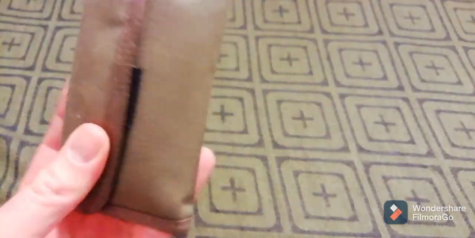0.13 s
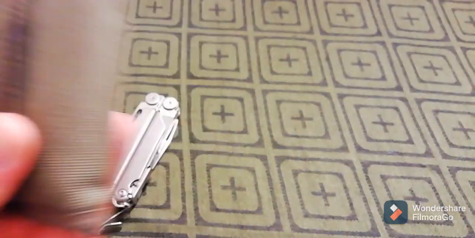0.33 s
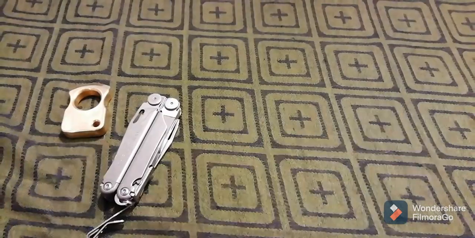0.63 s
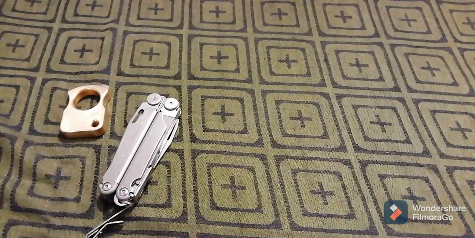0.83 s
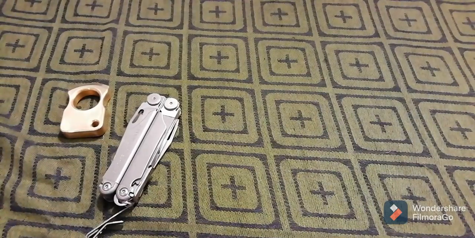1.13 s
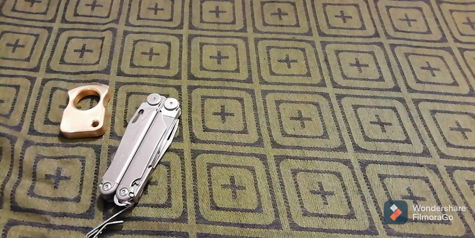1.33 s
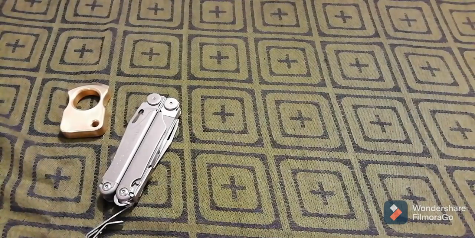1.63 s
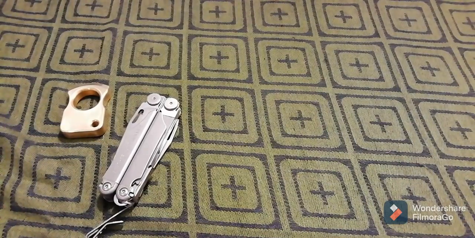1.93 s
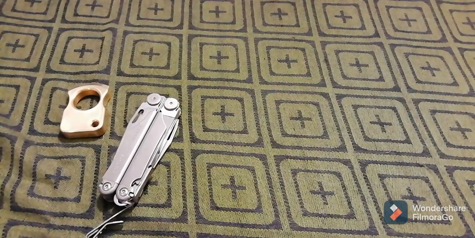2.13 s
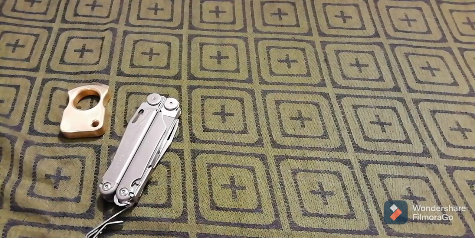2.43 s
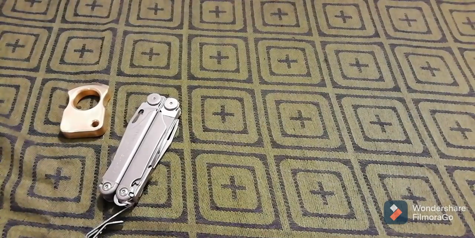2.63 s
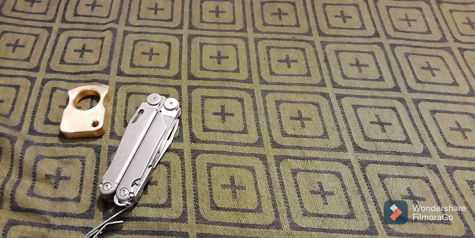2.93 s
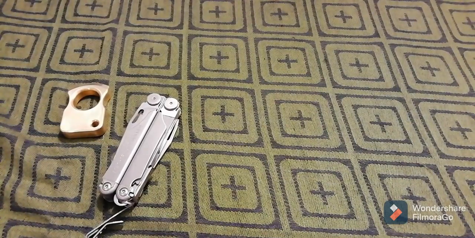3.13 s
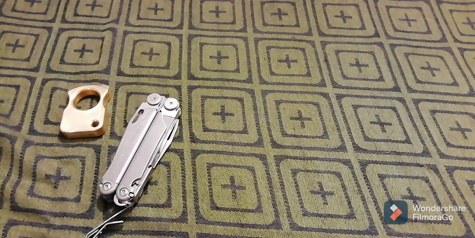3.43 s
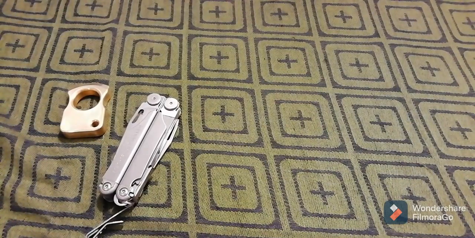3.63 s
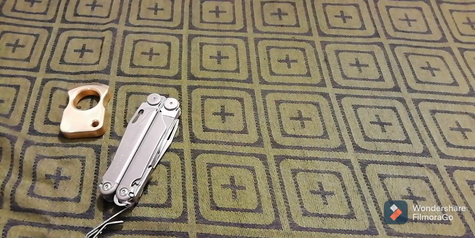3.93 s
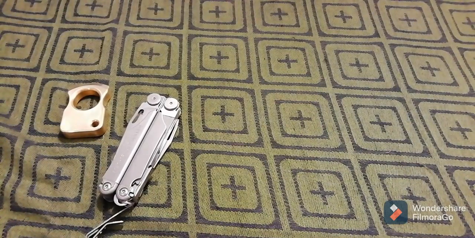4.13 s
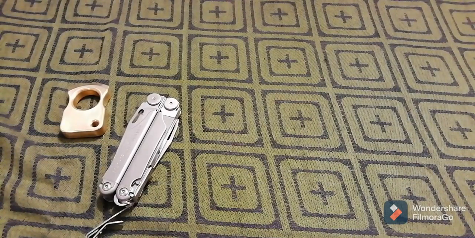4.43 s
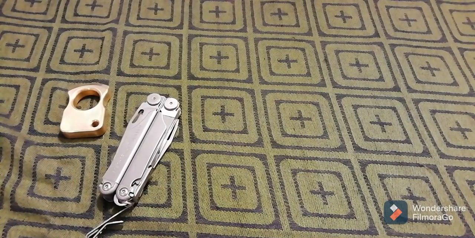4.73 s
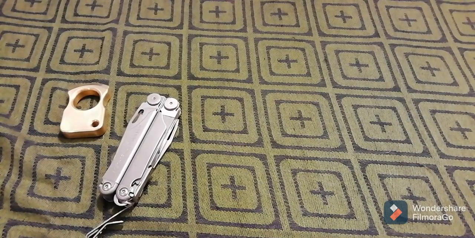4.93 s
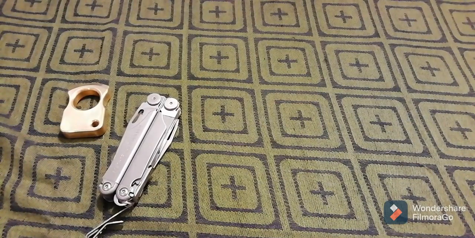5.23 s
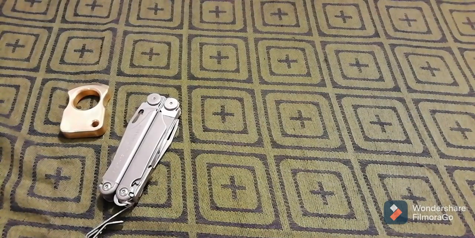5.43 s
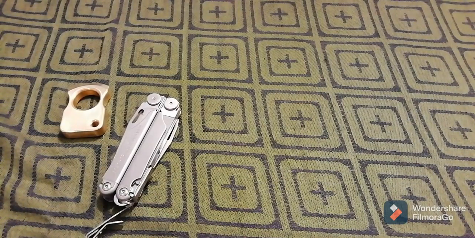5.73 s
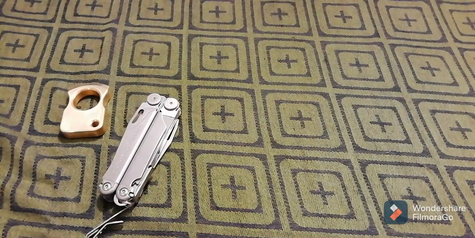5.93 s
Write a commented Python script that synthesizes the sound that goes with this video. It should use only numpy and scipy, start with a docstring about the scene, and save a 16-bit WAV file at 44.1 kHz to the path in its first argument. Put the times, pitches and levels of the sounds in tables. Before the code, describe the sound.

A fabric wallet's hook-and-loop flap snaps and rips open close up, followed by soft cloth rustling and light knocks.

```python
"""Hook-and-loop wallet, opened close up

In a small quiet room the flap lets go in hard snaps, one long rasping pull and a last short rip.
Released hooks crack and jerk the taut flap; ribs of weave chop the rasp and drum on the pouch.
Hands then turn the cloth over: fibres slip, scuff and squeak, and soft knocks ring the covered table."""
import sys
import numpy as np
from scipy import signal
from scipy.fft import rfft, irfft
from scipy.io import wavfile
from scipy.ndimage import uniform_filter1d

SR = 44100
rng = np.random.default_rng(int(sys.argv[2]) if len(sys.argv) > 2 else 0)


def materialize(psi):
    """Save the field psi as 16-bit PCM at rate SR to the path in sys.argv[1].

    A 1-D psi becomes a single channel; in a 2-D psi each row is a channel.
    """
    bounded = np.clip(np.atleast_2d(psi).T, -1, 1)
    quanta = np.round(bounded * 32767).astype(np.int16)
    wavfile.write(sys.argv[1], SR, quanta)


N = 268480
TIME = np.arange(N) / SR


def amp(db):
    """Decibels to gain."""
    return 10 ** (np.asarray(db) / 20)


def unit(x):
    """Scale to rms 1."""
    return x / np.sqrt(np.mean(x ** 2) + 1e-20)


def read(points, hz):
    """Interpolate a table on a log-frequency axis."""
    f, value = np.transpose(points)
    return np.interp(np.log(hz + 1), np.log(f + 1), value)


def add(mix, start_s, sound):
    """Mix a sound in at start_s."""
    part = mix[..., max(round(start_s * SR), 0):][..., :sound.shape[-1]]
    part += sound[..., :part.shape[-1]]


def level(rows, column, fade_s=0.008):
    """Gain over time from one dB column, fading outside its rows."""
    rows = np.array(rows)
    outside_s = np.maximum(rows[0, 0] - TIME, 0) + np.maximum(TIME - rows[-1, 0], 0)
    return amp(np.interp(TIME, rows[:, 0], rows[:, column])) * np.exp(-outside_s / fade_s)


def sides(db):
    """Stereo gains for a left-minus-right level."""
    return amp([[db / 2], [-db / 2]])


def colour(pair, spectrum, tilt_db_oct=0):
    """Shape two independent signals into what two spaced microphones hear, rms 1."""
    # left-right likeness: (frequency [Hz], correlation [-1..1])
    likeness = [(60, 1), (200, 0.34), (350, 0.064), (650, -0.54), (1200, 0.2), (2500, -0.32), (4500, 0.28),
                (8500, -0.19), (14000, -0.22)]
    size = pair.shape[1]
    hz, z = np.fft.rfftfreq(size, 1 / SR), rfft(pair)
    alike = np.clip(read(likeness, hz), -1, 1)
    mid, side = z[0] * np.sqrt(1 + alike), z[1] * np.sqrt(1 - alike)
    gain = amp(read(spectrum, hz) + tilt_db_oct * np.log2(np.maximum(hz, 250) / 1000))
    return unit(irfft(np.array([mid + side, mid - side]) * gain, size))


def wander(scale_s):
    """Smooth random drift, rms 1."""
    hz = np.fft.rfftfreq(N, 1 / SR)
    return unit(irfft(rfft(rng.standard_normal(N)) / (1 + (hz * scale_s) ** 4), N))


def fibres(per_s, spread_db, clump_db, smooth):
    """Clumps of tiny, uneven fibre slips over smooth sliding noise."""
    slips = (rng.random(N) < per_s / SR) * amp(spread_db * np.minimum(rng.exponential(1, N), 4))
    grains = unit(slips * rng.choice([-1., 1.], (2, N))) + smooth * rng.standard_normal((2, N))
    return grains * amp(clump_db * wander(0.064))


def click(gain, size=4096):
    """Minimum-phase pulse with this spectrum, peak 1."""
    log_gain = np.log(np.maximum(gain, 1e-5))
    mirrored = np.concatenate([log_gain, log_gain[-2:0:-1]])
    pulse = np.fft.ifft(np.exp(np.conj(signal.hilbert(mirrored)))).real[:size]
    return pulse / abs(pulse).max()


def ring(modes, size=12000):
    """Decaying struck modes, each slightly sharp at random, peak 1."""
    t = np.arange(size) / SR
    out = sum(amp(db - 60 * t / t60_s) * np.sin(2 * np.pi * hz * rng.uniform(1.0, 1.04) * t)
              for hz, db, t60_s in modes)
    return out / abs(out).max()


def hush(rms_db=-72):
    """Faint steady room noise."""
    # noise spectrum: (frequency [Hz], level [dB])
    spectrum = [(15, -32.5), (25, -15.5), (53, -4.5), (74, -8.5), (170, -12.5), (206, -14), (373, -20),
                (439, -22.5), (531, -22), (1040, -19), (2550, -22), (8590, -26.5), (11000, -30),
                (16000, -39.5)]
    return amp(rms_db) * colour(rng.standard_normal((2, N)), spectrum)


def room(x, first_s=0.0015, size=22050):
    """Sparse reflections from near walls, each band decaying at its own rate."""
    # reverberation: (frequency [Hz], t60 [s])
    decay = [(200, 0.24), (530, 0.26), (1400, 0.29), (3700, 0.22), (9700, 0.24), (16000, 0.23)]
    taps = rng.standard_normal((2, size)) * (rng.random((2, size)) < 0.1)
    taps *= np.arange(size) > first_s * SR
    hz, t, z = signal.stft(taps, SR, nperseg=256)
    tail = signal.istft(z * amp(-60 * t / read(decay, hz)[:, None]), SR, nperseg=256)[1]
    tail /= np.linalg.norm(tail, axis=1, keepdims=True)
    bass = signal.sosfilt(signal.butter(2, 350, fs=SR, output="sos"), tail[0] - tail[1]) / 2
    tail += np.array([-bass, bass])  # long waves reach both microphones alike
    return signal.fftconvolve(x, tail, axes=1)[:, :N]


def thuds():
    """A padded blow rings the table low; a harder one adds a hollow knock."""
    # blows on table and wallet: (time [s], thud [dB], knock [dB], table pitch [ratio])
    blows = [(1.69, -43, -75, 0.79), (1.785, -47, -53.5, 0.83), (2.164, -57.5, -68, 0.98),
             (2.622, -47.5, -75, 0.47), (2.64, -54, -75, 1), (4.963, -50, -59, 0.93),
             (5.056, -49.5, -69, 1), (5.661, -58, -29.5, 0.86), (5.672, -41, -58, 1),
             (5.689, -46, -46, 0.89), (5.715, -44, -44.5, 1)]
    # low ring and hollow knock: (frequency [Hz], level [dB], t60 [s])
    table_modes = [(66, -18, 0.049), (100, -3, 0.11), (131, -3, 0.23), (221.4, -5, 0.22), (278, -6, 0.13),
                   (412.4, -1.5, .04)]
    knock_modes = [(865, -0.5, 0.014), (1010, -6, .015), (1330, -5, 0.024), (1544, -5, 0.039)]
    out = np.zeros((2, N))
    for start_s, thud_db, knock_db, pitch in blows:
        low = ring([(hz * pitch, db, t60_s) for hz, db, t60_s in table_modes])
        knock = np.array([ring(knock_modes), ring(knock_modes)]) * sides(-1.5)
        add(out, start_s, amp(thud_db) * low + amp(knock_db) * knock)
    return signal.sosfilt(signal.butter(1, 60, "highpass", fs=SR, output="sos"), out)


def stroke(start_s, length_s, rise_s=0.008, fall_s=0.027):
    """Speed of a sliding hand: rise, hold, fall. Longer strokes start more gently."""
    rise = 1 / (1 + np.exp(np.clip((start_s - TIME) / (rise_s + 0.038 * length_s), -20, 20)))
    return rise * np.exp(-np.clip((TIME - start_s - length_s) / fall_s, 0, 20))


def hollows(x, depth_db=3.0):
    """Gaps between hands and cloth keep changing, so small resonances come and go."""
    z = signal.stft(x, nperseg=512, noverlap=384)[2]
    patches = uniform_filter1d(rng.standard_normal(z.shape[1:]), size=4, axis=0)
    patches = unit(uniform_filter1d(patches, size=16, axis=1))
    return unit(signal.istft(z * amp(depth_db * patches), nperseg=512, noverlap=384)[1][:, :N])


def rustle(contact_db=-76, give_db=-11, bend_s=0.035):
    """Cloth slides with a hiss, fingers rub over it and the wallet creaks low as it flexes."""
    # hand strokes: (start [s], length [s], hiss [dB], rub [dB])
    strokes = [(0, .11, -47.5, -66), (0.227, 0.055, -53.5, -71.5), (0.306, 0.086, -59, -67.5),
               (0.435, 0.14, -70, -71.5), (0.586, 0.065, -59, -58), (0.628, .19, -47.5, -57.5),
               (0.852, 0.099, -56.5, -67), (1.102, 0.082, -49, -60), (1.23, 0.082, -62.5, -69.5),
               (1.631, 0.047, -49, -63), (1.752, 0.073, -49.5, -52), (1.867, 0.076, -47.5, -63.5),
               (2.008, 0.08, -60, -71), (2.144, 0.11, -67, -78.5), (2.348, 0.13, -58.5, -73.5),
               (2.45, 0.14, -54, -65.5), (2.62, 0.22, -45, -58), (2.79, 0.054, -42, -46),
               (2.995, 0.043, -60, -74), (3.142, 0.031, -61, -62), (3.218, 0.053, -71, -79),
               (3.312, 0.06, -61, -60.5), (3.41, 0.054, -55, -56.5), (3.522, 0.16, -52, -67),
               (3.581, 0.04, -47, -50.5), (3.752, 0.098, -50.5, -54.5), (3.911, 0.032, -53, -56),
               (4.107, 0.047, -63.5, -73), (4.509, 0.17, -71.5, -77), (4.818, 0.18, -55, -66),
               (4.94, 0.038, -56, -54), (5.042, 0.036, -54, -57), (5.114, 0.24, -71, -69.5),
               (5.344, 0.065, -53.5, -61), (5.423, .2, -63.5, -65.5), (5.632, .26, -67, -74.5),
               (5.953, 0.1, -42, -53.5)]
    # tightest bends: (time [s], level [dB])
    bends = [(1.705, -65), (1.745, -56.5), (3.041, -57), (3.425, -62.5), (3.615, -61), (4.134, -62)]
    # sliding cloth, fingers, folding: (frequency [Hz], level [dB])
    hiss_spectrum = [(600, -27), (1800, -16), (3200, -8), (5600, -7), (7000, -5.5), (8500, 1.5), (9400, -5),
                     (10500, -14.5), (14000, -24), (16000, -30)]
    rub_spectrum = [(200, -19), (500, -7), (900, 1), (1250, -1.5), (1650, 0.5), (2200, -0.5), (3200, -6),
                    (6000, -25.5), (12000, -49.5)]
    fold_spectrum = [(30, -20), (90, -8), (140, -1.5), (220, -10.5), (320, 3.5), (480, -10), (900, -35),
                     (3000, -52.5)]
    power = np.zeros((2, N))
    power[0] = amp(contact_db) ** 2  # held cloth never lies quite still
    for start_s, length_s, hiss_db, rub_db in strokes:
        power += (amp([[hiss_db], [rub_db]]) * stroke(start_s, length_s)) ** 2
    hiss_gain, rub_gain = np.sqrt(power)
    fold_gain = sum(amp(db) * np.exp(-abs(TIME - at_s) / bend_s) for at_s, db in bends)
    fold_gain += amp(give_db) * rub_gain  # the wallet gives under the fingers
    creases = fibres(per_s=160, spread_db=3, clump_db=2, smooth=0.5)
    catches = fibres(per_s=350, spread_db=3.5, clump_db=1.5, smooth=0.6)
    slips = fibres(per_s=2500, spread_db=3.4, clump_db=0.94, smooth=0.41)
    hiss = hiss_gain * hollows(colour(slips, hiss_spectrum)) * sides(2.3)
    rub = rub_gain * hollows(colour(catches, rub_spectrum)) * sides(0.67)
    return hiss + rub + fold_gain * colour(creases, fold_spectrum)


def scuffs(size=12000):
    """Quick scrapes on the cloth catch and run out."""
    # scrapes: (start [s], peak rms [dB], rise [s], decay [s], tilt [dB/octave])
    scrapes = [(1.443, -42.5, 0.0016, 0.014, -4.5), (2.623, -42.5, 0.0044, 0.032, 1.5),
               (2.791, -37, 0.011, 0.015, 2), (2.842, -33, 0.0067, .015, 2),
               (3.617, -44.5, .003, 0.013, -4), (3.846, -48, 0.0026, .017, -4.5),
               (4.804, -53.5, .002, .039, 2), (4.947, -43.5, .002, 0.042, -3),
               (5.052, -51, 0.0026, .025, -6), (5.233, -54.5, 0.0035, 0.0064, -5),
               (5.368, -48, .002, 0.069, -0.5), (5.929, -26.5, 0.014, 0.023, 1),
               (5.959, -36, 0.0047, 0.039, -1)]
    # scraped cloth: (frequency [Hz], level [dB])
    spectrum = [(25, -26), (100, -8), (300, -5), (520, -2.5), (760, -22.5), (1100, -1), (1600, 1),
                (2600, -0.5), (4300, 5.5), (5800, 2.5), (8200, 10), (9400, 5.5), (10600, -6), (16000, -19)]
    out, t = np.zeros((2, N)), np.arange(size) / SR
    grains = fibres(per_s=3500, spread_db=3.2, clump_db=1, smooth=0.44)
    for start_s, db, rise_s, decay_s, tilt_db_oct in scrapes:
        envelope = np.minimum(t / rise_s, 1) * np.exp(-np.maximum(t - rise_s, 0) / decay_s)
        drive = np.roll(grains, -round(start_s * SR), axis=1)[:, :size]
        add(out, start_s, amp(db) * envelope * colour(drive, spectrum, tilt_db_oct))
    return out * sides(0.6)


def squeaks(stutter_db=4, stutter_s=0.012):
    """Uneven stick-slip sings in one gliding resonance of the stretched cloth."""
    # finger drags: (start [s], length [s], rms [dB], first pitch [Hz], last pitch [Hz], width [Hz])
    drags = [(0, 0.15, -67.5, 980, 840, 117), (.3, 0.2, -76.5, 880, 830, 140),
             (2.996, 0.0694, -62.5, 1750, 1950, 895), (3.059, .02, -58, 1880, 1780, 900),
             (3.519, 0.18, -54, 2160, 2430, 900), (3.934, 0.029, -51.5, 1670, 1350, 120),
             (3.981, 0.031, -69, 1444, 1440, 252), (4.053, 0.12, -64, 2000, 1670, 473),
             (4.786, 0.06, -59.5, 2180, 2050, 795), (5.228, 0.028, -58, 2256, 2350, 221),
             (5.363, 0.072, -54.5, 3150, 2980, 514), (4.937, 0.031, -52.5, 466, 453, 248),
             (5.922, 0.054, -50.5, 790, 822, 118)]
    out = np.zeros((2, N))
    slips = fibres(per_s=600, spread_db=2, clump_db=1, smooth=0.7) * amp(stutter_db * wander(stutter_s))
    for start_s, length_s, db, first_hz, last_hz, width_hz in drags:
        size = round(length_s * SR)
        carrier = np.exp(2j * np.pi * np.cumsum(np.linspace(first_hz, last_hz, size)) / SR)
        drive = np.roll(slips, -round(start_s * SR), axis=1)[:, :size]
        lowpass = signal.butter(2, width_hz / 2, fs=SR, output="sos")
        sung = (carrier * signal.sosfilt(lowpass, drive / carrier)).real  # gliding band-pass
        add(out, start_s, amp(db) * unit(sung * signal.windows.tukey(size, 0.7)))
    return out


def pull(gain_db=-1, chop=0.35, jitter=0.18, rib_tone_db=-26):
    """Ribs of weave catch in turn: they chop the rasp and drum on the hollow pouch."""
    # course of the pull: (time [s], rasp [dB], drone [dB])
    levels = [(1.42, -68, -70.5), (1.464, -37.5, -45), (1.494, -25, -40.5), (1.538, -21.5, -44),
              (1.588, -29.5, -36), (1.664, -54, -62.5), (1.69, -59.5, -62)]
    # ribs passing: (time [s], rate [Hz])
    ribs = [(1.42, 279.7), (1.49, 323.2), (1.53, 333.4), (1.56, 347), (1.577, 302), (1.588, 131.7),
            (1.69, 123)]
    # tearing hooks: (frequency [Hz], level [dB])
    rasp_spectrum = [(60, -46.5), (200, -15), (450, -9.5), (1000, -10.5), (1650, -3), (2350, -12),
                     (3500, -3), (4700, -2.5), (5300, -9.5), (6600, -13), (8250, 0.5), (9400, -12),
                     (10200, -25), (15000, -25)]
    # thin tones in the rasp, pouch resonances: (frequency [Hz], width [Hz], gain [dB])
    whistles = [(1970, 16, 9), (3687, 46, 2.5), (4100, 50, 4), (4750, 230, 6.5)]
    pouch_modes = [(140, 32, 3), (300, 41, -2.5)]
    rate_hz = np.interp(TIME, *np.transpose(ribs)) * (1 + jitter * wander(0.0032))
    phase = 2 * np.pi * np.cumsum(rate_hz) / SR
    hz = np.fft.rfftfreq(N, 1 / SR) + 1
    grains = fibres(per_s=7000, spread_db=1.1, clump_db=0.8, smooth=0.99)
    rasp = colour(grains * (1 + chop * np.cos(phase)), rasp_spectrum)
    lift = 1 + sum((amp(db) - 1) / (1 + 2j * (hz - f) / width) for f, width, db in whistles)
    rasp = unit(irfft(rfft(rasp) * lift, N)) * sides(-2.0)
    tugs = np.cos(phase) + 0.88 * np.cos(2 * phase) + 1.8 * rng.standard_normal(N)
    pouch = sum(amp(db) / (1 + 1j * f / width * (hz / f - f / hz)) for f, width, db in pouch_modes)
    pouch /= 1 + (hz / 550) ** 4
    drone = irfft(rfft(tugs) * pouch, N) + amp(rib_tone_db) * np.cos(phase)
    drone /= np.sqrt(uniform_filter1d(drone ** 2, size=900) + 1e-12)  # running rms 1
    return amp(gain_db) * (level(levels, column=1) * rasp + level(levels, column=2) * drone)


def rip(start_s=1.7765, end_s=1.7944, count=9, first_db=-19, last_db=-15.5, spread_db=2.0):
    """The last hooks tear off in one uneven run under growing load: event rows for snaps()."""
    late, strength, pitch, crack, pan = rng.standard_normal((count, 5)).T
    times_s, gap_s = np.linspace(start_s, end_s, count, retstep=True)
    db = np.linspace(first_db, last_db, count) + spread_db * strength
    flap_hz = 2900 * np.exp(0.15 * pitch)
    crack_db = 13 + spread_db * (crack - strength) / 2
    pan_db = 2 + spread_db * pan
    return list(zip(times_s + 0.2 * gap_s * late, db, flap_hz, crack_db, pan_db))


def snap_paths(pan_db, t, scatter_db=-11, scatter_s=0.0049, lag_s_per_db=0.00005):
    """Stereo impulse response: direct sound, then scatter and bounces off hands and table."""
    # echoes off the table top and nearby things: (delay [s], level [dB])
    bounces = [(.0003, -14), (.0029, -7.5), (.0085, -13.5), (0.0236, -19.5)]
    paths = rng.standard_normal((2, t.size)) * (rng.random((2, t.size)) < 0.15) * np.exp(-t / scatter_s)
    paths *= amp(scatter_db) / np.linalg.norm(paths, axis=1, keepdims=True)
    right_lag_s = lag_s_per_db * max(pan_db, 0)  # further left arrives later on the right
    for path, direct_s in zip(paths, (0, right_lag_s)):
        path[round(direct_s * SR)] += 1
        for delay_s, db in bounces:
            path[round((direct_s + delay_s * rng.uniform(0.9, 1.1)) * SR)] += amp(db)
    return paths


def snaps(flap_q=0.63, push_db=-16, ring_db=-18, burst_s=0.00035, highpass_hz=170, size=4096):
    """A few hooks let go together: they crack, and the taut flap jerks and rings."""
    # hook releases and cloth flicks:
    # (time [s], strength [dB], flap pitch [Hz], crack re flap [dB], left-right [dB])
    releases = [(.551, -47, 1850, -8, 1.5), (.777, -28.5, 1210, 6.5, 7), (0.9728, -5, 2600, -9.5, 8),
                (1.0084, -8.5, 2300, 1.5, 7), (1.0181, -17, 2340, 3, 13), (1.3073, -13.5, 2800, 6, 1),
                (2.467, -36.5, 4570, 8.5, 0), (2.833, -29.5, 940, -10, 6), (2.8443, -25.5, 1850, 8, -6.5),
                (3.066, -49.5, 1125, 10, 0.5), (3.321, -46.5, 1710, -9, -6), (3.63, -36.5, 1910, -7, 1.5),
                (3.7629, -29.5, 1530, 1, 5), (3.822, -38, 1000, -8, 7), (3.853, -36, 1290, -4, 4),
                (3.917, -47, 1500, 14.5, 1), (4.138, -41, 1500, -15, 2.5), (4.767, -43.5, 2390, 3, 3.5),
                (4.821, -40.5, 2210, 3.5, 10), (4.8863, -24, 2100, -15, 5), (4.949, -38, 690, 14, 9),
                (5.055, -39, 1580, -1, -11), (5.169, -40.5, 2180, 4.5, 3), (5.3695, -42.5, 3160, 10, 12.5)]
    # hook crack, hollow wallet's response: (frequency [Hz], level [dB])
    crack_spectrum = [(30, -58.5), (200, -24.5), (1200, -20), (4500, -12), (6000, -14.5), (7300, -6.5),
                      (8400, -2), (9400, -9), (10600, -19), (14000, -28.5), (17000, -46.5)]
    body_spectrum = [(200, -5), (430, -4), (700, 4.5), (950, 3), (1270, -6), (1750, 2), (2400, -0.5),
                     (3200, -0.5), (4300, 1), (6000, 0.5)]
    # stiff flap: (frequency [Hz], level [dB], t60 [s])
    flap_modes = [(740, -0.5, 0.0085), (960, -9, .014), (1750, -1.5, 0.011), (2193, 3.5, .022),
                  (2860, 0.5, 0.025), (4390, -0.5, 0.016)]
    out, hz, t = np.zeros((2, N)), np.fft.rfftfreq(size, 1 / SR) + 1, np.arange(size) / SR
    hook = click(amp(read(crack_spectrum, hz)))
    body = amp(read(body_spectrum, hz)) / (1 + (hz / 6500) ** 10)
    push = amp(push_db) / (1 + (hz / 1200) ** 2) / (1 + (450 / hz) ** 3)
    for start_s, db, flap_hz, crack_db, pan_db in releases + rip():
        swing = 1 / (1 + (flap_q * (hz / flap_hz - flap_hz / hz)) ** 2)
        jerk = click(body * (swing + push))
        burst = rng.choice([-1., 1.], (2, size)) * np.exp(-t / burst_s)
        crack = signal.fftconvolve(burst / np.linalg.norm(burst[0]), hook[None], axes=1)[:, :size]
        pulse = jerk + amp(ring_db) * ring(flap_modes, size) + amp(crack_db) * crack
        heard = signal.fftconvolve(snap_paths(pan_db, t), pulse, axes=1)
        add(out, start_s, amp(db) * sides(pan_db) * heard)
    return signal.sosfilt(signal.butter(1, highpass_hz, "highpass", fs=SR, output="sos"), out)


def scene():
    """Wallet and table in the room, over its hush."""
    snap, rasp = snaps(), pull()
    cloth = rustle() + scuffs() + squeaks()
    thud = thuds()
    echo = room(amp(-5.5) * snap + amp(-9) * (rasp + cloth) + thud)
    return snap + rasp + cloth + thud + echo + hush()


def record(dry):
    """Soft peak limiting, then the recorder's band limit."""
    ceiling, edge_hz = 0.7, 16100
    rounded = dry / (1 + (dry / ceiling) ** 6) ** (1 / 6)
    lowpass = signal.firwin(301, edge_hz, window=("kaiser", 8), fs=SR)
    return signal.oaconvolve(rounded, lowpass[None], "same")


dry = scene()
out = record(dry)
materialize(out)
```